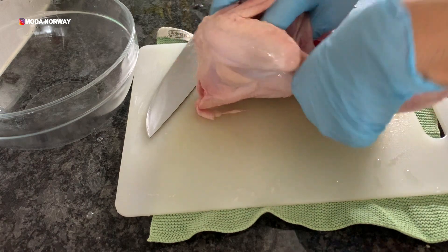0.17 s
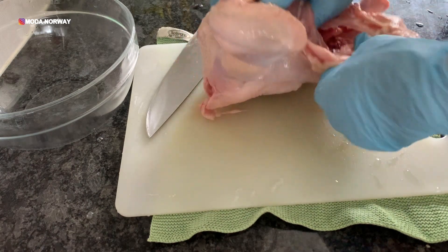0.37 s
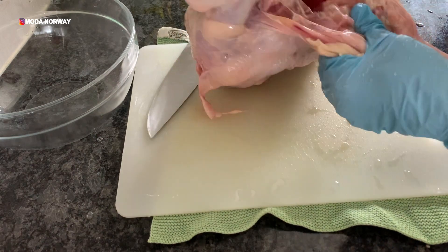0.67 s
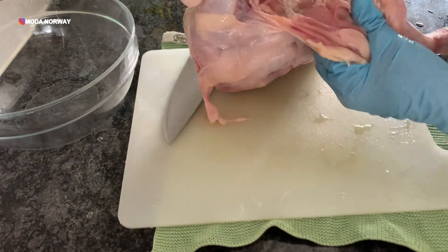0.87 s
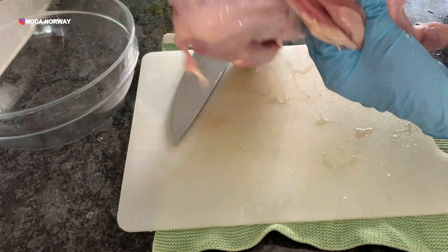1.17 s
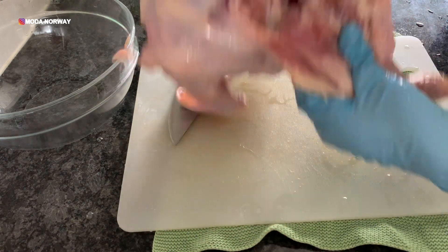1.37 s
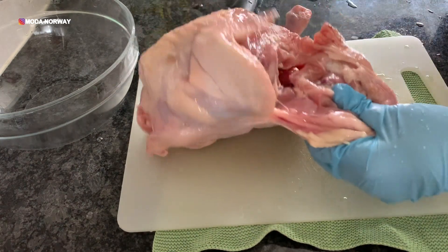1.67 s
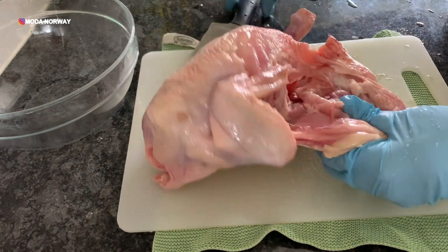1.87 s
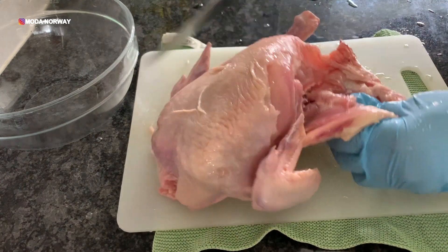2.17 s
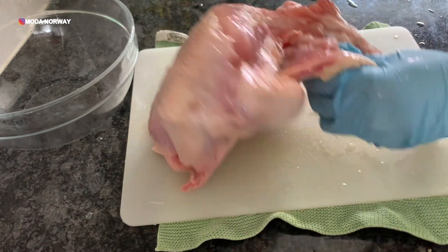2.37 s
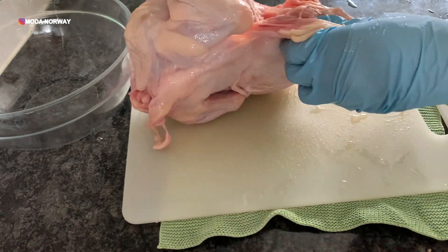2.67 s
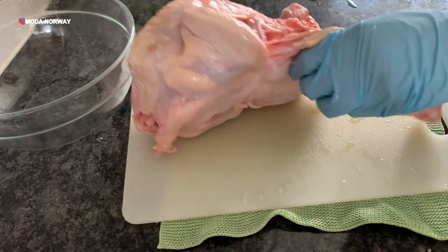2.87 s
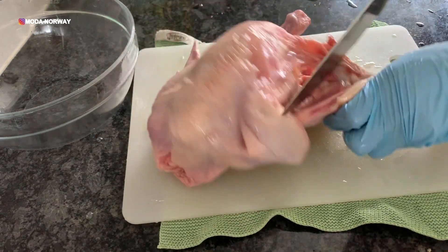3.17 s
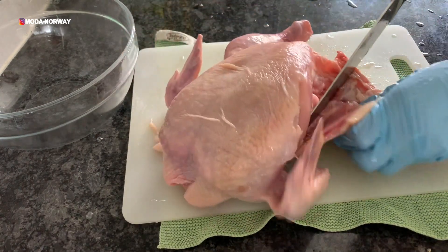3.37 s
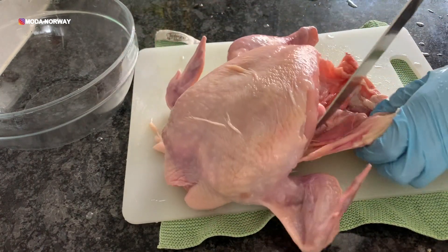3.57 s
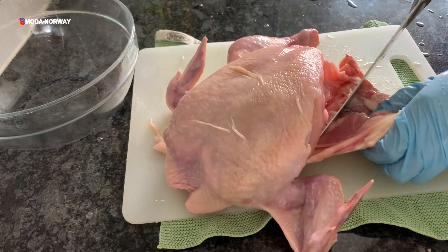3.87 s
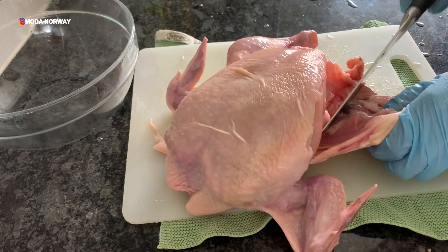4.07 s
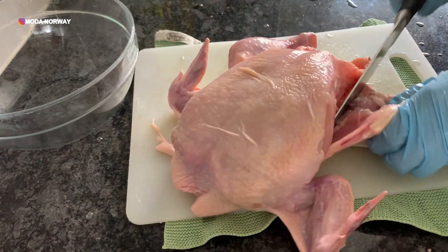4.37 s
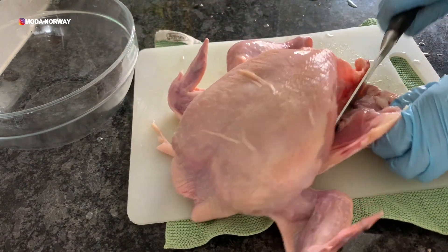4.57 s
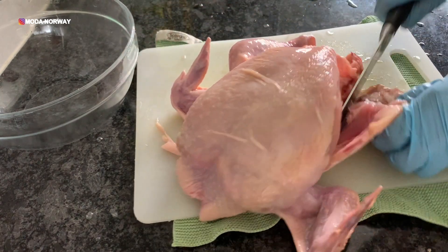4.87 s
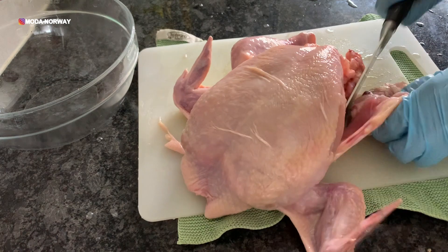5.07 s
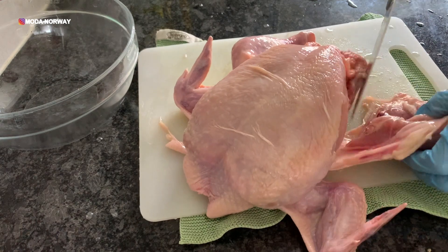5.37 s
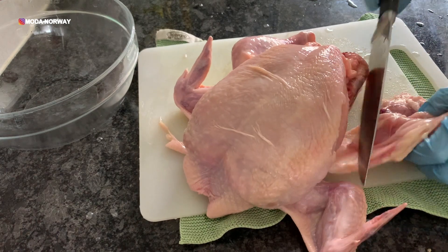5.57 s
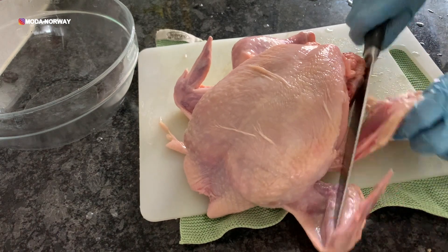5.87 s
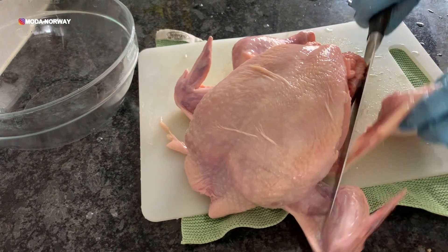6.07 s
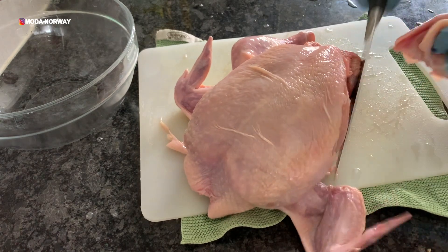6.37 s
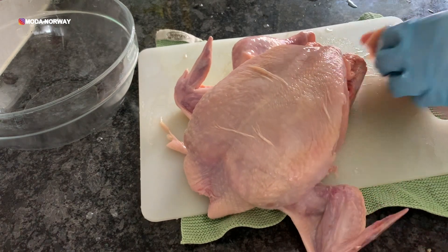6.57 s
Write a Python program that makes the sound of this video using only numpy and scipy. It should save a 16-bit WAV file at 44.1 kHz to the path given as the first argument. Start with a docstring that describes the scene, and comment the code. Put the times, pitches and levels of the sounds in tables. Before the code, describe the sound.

Close stereo microphones catch wet skin crackling and joints popping as a carcass is handled, with heavy fleshy thuds on plastic. Handling becomes lighter and sparser, then rhythmic knife strokes rasp and crunch through ribs, each making the board drone and sometimes knock. The loudest cut is followed by a short pause, three more strokes, a faint slip and a last soft thud. Short kitchen reflections and faint low rumble surround it.

```python
"""A small kitchen, with two microphone ports close to a plastic board where a raw chicken is handled and cut.
Gloved hands pull at the carcass: wet skin crackles and squelches (random grains, small damped rings),
joints snap (short noise bursts), and the meat flops onto the board (sinking tones and a resonant thud).
A knife then saws through the ribs in short strokes: slip grains hiss, crunch and make the board drone.
Behind it lie the room's reflections, quiet air and a low rumble of the worktop."""
import sys
import numpy as np
from scipy import signal
from scipy.fft import rfft, irfft, next_fast_len
from scipy.io import wavfile
from scipy.ndimage import uniform_filter1d, map_coordinates

SR = 44100
rng = np.random.default_rng(int(sys.argv[2]) if len(sys.argv) > 2 else 0)


def wrap_up_sound(samples):
    """Save the sound to the file named by the first command line argument, as 16-bit audio."""
    columns = np.atleast_2d(samples).T
    # keep every value between -1 and 1, then stretch to whole-number steps
    tamed = np.clip(columns, -1, 1)
    steps = np.round(tamed * 32767).astype(np.int16)
    wavfile.write(sys.argv[1], SR, steps)


N = 296793  # length in samples
TOP_HZ = 15850  # upper edge of the band

# All dB values in the tables are relative: the functions add their own trims.
# Low rumble of the worktop over time. Each row: time in seconds, level in dB.
RUMBLE_LEVELS = [(0.0, -45.5), (0.09, -49), (0.13, -45.5), (0.25, -42), (0.3, -49.5), (0.47, -52.5),
                 (0.63, -55), (0.69, -40), (0.85, -48.5), (1.37, -59.5), (1.42, -48.5), (1.74, -68.5),
                 (1.87, -54.5), (2.2, -66.5), (5.4, -68), (6.5, -53), (6.65, -56), (6.73, -54)]
# Colour of that rumble. Each row: frequency in Hz, level in dB.
RUMBLE_COLOUR = [(20, -12), (33, -37.5), (45, 4.5), (56, 1.5), (90, -7), (200, -29), (500, -62.5)]
# Colour of the quiet room air. Each row: frequency in Hz, level in dB.
AIR_COLOUR = [(20, -28), (35, -28.5), (55, -4), (85, 0), (125, 8.5), (170, 4), (260, -7), (500, -8.5),
              (1200, -18), (3000, -18), (10000, -20.5), (15500, -25)]
# Dying away of the kitchen. Each row: frequency in Hz, time to fall 60 dB in seconds.
KITCHEN_T60 = [(200, 0.51), (530, 0.33), (1400, 0.44), (3700, 0.38), (10000, 0.28), (16000, 0.25)]
# Left-right likeness of diffuse sound. Each row: frequency in Hz, correlation from -1 to 1.
LIKENESS = [(100, .93), (300, .65), (800, .25), (2500, -.1), (7000, .1), (10000, .65), (15000, .7)]
# Phase between the microphone ports. Each row: frequency in Hz, lead of the left in radians.
PORT_PHASE_LEAD = [(4000, 0), (6500, -.3), (8000, -1.6), (8900, -3.4), (9600, -5.3), (10800, -6.9),
                   (11700, -9.4), (12900, -12.1), (14100, -13), (15000, -16), (16000, -18)]
# Level between the microphone ports. Each row: frequency in Hz, left minus right in dB.
PORT_LEVEL_TILT = [(100, .6), (700, 1.8), (1300, -.3), (3000, 1.2), (5000, -2.2), (6700, -3.7), (9500, -.3),
                   (15000, 0)]

# Resonances of the bare board. Each row: frequency in Hz, width in Hz, level in dB.
BOARD_MODES = [(180, 100, -11), (290, 90, -16), (403, 50, -12), (615, 90, 1), (707, 66, 5), (845, 80, -2.5),
               (1082, 150, -13), (1325, 45, -9)]
# Resonances of the board under meat. Each row: frequency in Hz, width in Hz, level in dB.
LOADED_BOARD_MODES = [(70.4, 29, -2.5), (138, 37, 3.5), (184, 31, 1.5), (244, 110, -4), (394, 640, -16.5),
                      (620, 44, 3.5), (740, 46, -10), (1100, 260, -9)]

# Each grip, pull or push on the wet meat.
# Each row: start in seconds, hold in seconds, squelch in dB, rubbing on the board in dB.
HAND_MOVES = [(0, 0.01, -41, -51), (0.069, 0.1, -51, -48.5), (0.27, 0.33, -46.5, -58.5),
              (0.635, 0.27, -47, -48), (0.908, 0.074, -57, -55), (1.145, 0.25, -63, -72),
              (1.432, 0.014, -40.5, -41.5), (1.494, 0.018, -43.5, -50), (2.017, 0.05, -46.5, -44),
              (2.218, 0.057, -46, -51), (2.307, 0.14, -52, -56), (2.777, 0.031, -58.5, -80.5),
              (2.953, 0.039, -50.5, -67), (3.192, 0.0313, -61.5, -59), (3.213, 0.11, -79, -56.5),
              (3.4, 0.049, -53.5, -45.5), (3.48, 0.032, -57, -49.5), (3.667, 0.09, -70.5, -57),
              (3.932, 0.0044, -56.5, -51.5)]
# Time to gain 20 dB in a grip: squelch, then rubbing, in seconds.
GRIP_RISE_S = [0.12, 0.046]
# Time to lose 20 dB after a grip: squelch, then rubbing, in seconds.
GRIP_FALL_S = [0.13, 0.039]
# Colour of wet skin. Each row: frequency in Hz, level in dB.
WET_COLOUR = [(300, -24), (900, -22), (2000, -5.5), (4500, 2), (7000, 4.5), (10400, 6), (12000, -1),
              (14000, 6.5), (15700, -17.5)]
# Colour of meat dragged on plastic. Each row: frequency in Hz, level in dB.
RUB_COLOUR = [(100, 2), (250, -4.5), (450, -10), (700, 6.5), (1100, -11), (1600, -6), (3000, -3),
              (6000, -14)]
# Skin sliding and peeling. Each row: time of the height in seconds, width in seconds, level in dB.
SLIDES = [(2.058, 0.019, -45.5), (2.955, 0.012, -35.5), (3.433, 0.018, -49.5), (6.581, 0.0085, -62.5),
          (6.65, 0.12, -65.5)]
# Pockets of wet air squeezed out of skin and meat.
# Each row: time of the height in seconds, width in seconds, level in dB, middle pitch in Hz.
SQUISHES = [(.08, .05, -59, 1170), (.35, .08, -61.5, 1930), (.74, .06, -52, 2020),
            (2.036, .02, -55.5, 3020), (2.073, .01, -46, 1310), (3.26, .045, -60.5, 1370),
            (3.435, .025, -54.5, 1510), (3.5, .015, -59, 1100), (3.72, .012, -61.5, 1900),
            (6.583, .005, -52, 2200), (6.642, .008, -61.5, 2000)]
# The carcass sagging onto the board. Each row: time of the height in seconds, width in seconds, level in dB.
SAGS = [(1.46, 0.057, -48.5), (1.86, 0.025, -63), (1.97, 0.036, -46.5), (3.33, 0.037, -51.5),
        (3.47, 0.018, -56), (6.63, 0.076, -56)]
# Meat and bone landing on the board. Each row: start in seconds, slap in dB, starting pitch of the slap in Hz,
# time for the slap to fall 60 dB in seconds, thud of the weight in dB.
FLOPS = [(0.667, -24, 893, 0.032, -35), (0.672, -32.5, 340, 0.042, -39), (0.786, -39, 717, 0.047, -39),
         (1.398, -25.5, 992, 0.03, -52), (1.422, -36, 3276, 0.067, -33.5), (1.424, -26.5, 2085, 0.05, -44),
         (1.43, -15.5, 1104, 0.032, -57), (1.437, -22.5, 747, 0.034, -28), (1.44, -26, 237, 0.058, -46),
         (1.473, -41, 903, 0.05, -39), (1.832, -53, 383, 0.12, -37), (1.872, -46, 221, 0.09, -35),
         (1.936, -26, 786, 0.046, -33.5), (1.955, -58, 435, 0.075, -44), (1.984, -42, 1000, 0.035, -50),
         (1.997, -34, 1104, 0.03, -45), (2.001, -29.5, 320, 0.045, -43), (2.074, -44.5, 944, 0.058, -44),
         (3.255, -42.5, 705, 0.04, -65), (3.416, -51, 1120, 0.072, -62), (3.423, -37, 577, 0.045, -48),
         (3.436, -37, 329, 0.051, -58), (3.492, -42, 679, 0.049, -64), (3.5, -43, 342, 0.069, -49),
         (3.522, -67, 298, .08, -41), (3.676, -51, 677, 0.074, -52), (6.584, -29, 682, 0.049, -31),
         (6.586, -30.5, 380, 0.058, -20), (6.612, -69, 617, 0.17, -29)]
# Joints, gristle and wet skin snapping. Each row: start in seconds, high crack in dB, lower pop in dB.
SNAPS = [(0.051, -52, -44), (0.2702, -38, -54), (0.285, -42, -44), (0.301, -47, -43), (0.3363, -41, -41),
         (0.3582, -38.5, -47), (0.4434, -28, -43), (0.4603, -36.5, -43), (0.479, -50, -44),
         (0.5257, -20.5, -26), (0.6329, -29, -32), (0.6689, -35, -30), (0.703, -26, -35),
         (0.7313, -40, -43), (0.7843, -12, -21.5), (0.8745, -42, -44), (0.957, -50, -46),
         (1.0599, -43, -66), (1.0707, -42, -70), (1.399, -28.5, -46), (1.419, -23, -37), (1.4315, -44, -30),
         (1.4425, -46, -35), (1.741, -52, -68), (1.9152, -49, -62), (1.9995, -48, -41), (2.2842, -38, -62),
         (2.4733, -37.5, -80), (2.853, -46, -76), (3.222, -50, -53), (3.4483, -43.5, -51),
         (3.926, -39, -39), (3.994, -52, -57), (4.1, -50, -36), (4.1473, -29.5, -41), (4.2012, -41, -68),
         (4.2784, -35, -48), (4.473, -32, -33), (4.5353, -35, -42), (4.5608, -26, -33), (4.717, -31, -44),
         (4.7872, -23, -31), (5.2055, -24, -23), (5.326, -45, -66), (5.372, -66, -52), (6.259, -52, -41)]
# Colour of the top of a snap. Each row: frequency in Hz, level in dB.
CRACK_COLOUR = [(1500, -29.5), (4500, -5.5), (6800, 4), (10400, 5.5), (13000, 1.5), (15500, 3)]
# Colour of the body of a snap. Each row: frequency in Hz, level in dB.
POP_COLOUR = [(200, -23), (500, 3.5), (900, 7.5), (1500, 9.5), (3200, 13.5), (4800, 8.5), (12000, -20.5)]

# Thin wet scrapes. Each row: time of the height in seconds, width in seconds, level in dB, pitch in Hz.
SCRAPES = [(3.682, 0.0044, -56.5, 6300), (3.735, 0.012, -59, 5700), (3.882, 0.0087, -57.5, 5460),
           (4.022, 0.017, -52.5, 4000), (4.095, 0.033, -46.5, 2070), (6.249, 0.01, -51, 2480)]
# The blade breaks through a rib and knocks the board. Each row: start in seconds, ring in dB, low thump in dB.
KNOCKS = [(4.472, -34, -33), (4.563, -34.5, -25.5), (4.727, -21, -30), (4.844, -20.5, -32),
          (4.856, -27.5, -50.5), (5.029, -24.5, -53), (5.072, -30, -61), (5.191, -18, -37),
          (5.206, -12.5, -15), (5.93, -19, -38), (6.064, -25, -29.5), (6.311, -26, -42)]
# Knife strokes. Each row: start in seconds, hold in seconds, hiss of the edge in dB, crunch of bone in dB,
# drone of the board in dB.
STROKES = [(4.075, 0.035, -37, -64, -52.5), (4.243, 0.089, -45.5, -52, -55.5),
           (4.396, 0.087, -33, -39.5, -38.5), (4.558, 0.082, -34.5, -38, -35.5),
           (4.725, 0.04, -33.5, -33, -31), (4.855, 0.045, -34, -30, -30.5),
           (4.912, 0.015, -29.5, -35.5, -34), (5.031, 0.032, -39, -33.5, -30.5),
           (5.196, 0.021, -28, -25.5, -23.5), (5.751, 0.045, -38.5, -47.5, -63),
           (5.906, 0.034, -28.5, -29.5, -22), (6.058, 0.064, -34.5, -36.5, -39),
           (6.302, 0.018, -40, -40.5, -35), (6.417, 0.043, -55.5, -82, -70)]
# Faint hiss and board ring lingering under and after the strokes.
# Each row: start in seconds, hold in seconds, hiss in dB, crunch in dB, board in dB.
LINGERING = [(4.362, 0.99, -58.5, -69, -57), (5.687, 0.1, -50.5, -58.5, -65),
             (5.991, 0.06, -60.5, -63, -45.5)]
# Time to gain 20 dB into a stroke: hiss and crunch swell together, the board faster.
# The values: hiss, crunch, board, in seconds.
STROKE_RISE_S = [0.046, 0.047, 0.031]
# Time to lose 20 dB as the blade stops: hiss, crunch, board, in seconds.
STROKE_FALL_S = [0.041, 0.026, 0.017]
# Colour of the edge in flesh. Each row: frequency in Hz, level in dB.
FLESH_COLOUR = [(600, -35.5), (2500, 1), (4500, 10.5), (5800, 3.5), (8300, 9.5), (9500, 9), (10600, 5),
                (13500, 6.5), (15700, -2)]
# Colour of the edge in bone. Each row: frequency in Hz, level in dB.
BONE_COLOUR = [(250, -19), (800, -28.5), (1350, -9), (1900, -1), (3000, 2), (3700, -5), (5000, -11.5),
               (9000, -24)]


def amp(db):
    """Decibels to gain."""
    return 10 ** (np.asarray(db) / 20)


def unit(x):
    """Scale to rms 1."""
    return x / np.sqrt(np.mean(x ** 2) + 1e-20)


def along(points, hz):
    """(Hz, value) points read on a log axis."""
    f, v = np.transpose(points)
    return np.interp(np.log(hz + 1), np.log(f), v)


def wobble(rate):
    """A smooth random curve, rate knots a second."""
    knots = rng.standard_normal(int(N * rate / SR) + 4)
    return map_coordinates(knots, [np.arange(N) * rate / SR])


def filtered(x, response):
    """x times a complex response of frequency."""
    n = x.shape[-1]
    m = next_fast_len(n + SR // 4)
    return irfft(rfft(x, m) * response(np.fft.rfftfreq(m, 1 / SR)), m)[..., :n]


def coloured(x, points, size=8192):
    """x through a causal filter with the given (Hz, dB) shape."""
    # Folding the cepstrum forward in time gives the minimum-phase filter
    cepstrum = irfft(np.log(amp(along(points, np.fft.rfftfreq(size, 1 / SR)))))
    cepstrum[1:size // 2] *= 2
    cepstrum[size // 2 + 1:] = 0
    return signal.fftconvolve(x, irfft(np.exp(rfft(cepstrum))))[:len(x)]


def resonate(x, modes):
    """x through a body's resonances, band-passes added with alternating sign."""
    def response(f):
        total = 0
        for k, (centre, width, db) in enumerate(modes):
            damping = 1j * f * width
            total = total + (-1) ** k * amp(db) * damping / (centre * centre - f * f + damping)
        return total
    return filtered(x, response)


def add(track, s, sound):
    """Mix a sound in at time s."""
    part = track[max(round(s * SR), 0):][:len(sound)]
    part += sound[:len(part)]


def grains(rate, spread_db, smooth):
    """Random tiny slips, nearly equal in size when spread_db is near 0, rate a second, over smooth friction."""
    sizes = amp(spread_db * np.minimum(rng.exponential(size=N), 4)) * rng.choice([-1, 1], N)
    slips = unit(sizes * (rng.random(N) < rate / SR))
    return unit(slips + smooth * rng.standard_normal(N))


def drifting(x, depth_db, size):
    """The colour drifts over patches of size bands as the contact point moves."""
    z = signal.stft(x, nperseg=512)[2]
    field = uniform_filter1d(rng.standard_normal(z.shape), size=size, axis=0)
    field = uniform_filter1d(field, size=10, axis=1)
    return unit(signal.istft(z * amp(depth_db * unit(field)), nperseg=512)[1][:N])


def bending(x, depth, rate):
    """The pitch of a ring wanders as the load on the board shifts."""
    return map_coordinates(x, [np.cumsum(1 + depth * wobble(rate))], order=1, mode="mirror")


def swells(rows, rise_s, fall_s):
    """Rise, hold and release for each (start, hold, dB, ..) row; one gain curve for each dB column."""
    t = np.arange(N) / SR
    power = 0
    for start, hold, *levels in rows:
        before, after = np.maximum(start - t, 0), np.maximum(t - start - hold, 0)
        fade = before / np.vstack(rise_s) + after / np.vstack(fall_s)  # in steps of 20 dB
        power = power + amp(np.vstack(levels) - 20 * np.minimum(fade, 10)) ** 2
    return np.sqrt(power)


def humps(rows):
    """A bell-shaped gain for each (time of the height, width, dB) row."""
    t = np.arange(N) / SR
    return sum(amp(db) * np.exp(-.5 * ((t - s) / width) ** 2) for s, width, db in rows)


def pips(start, hz, strength, cycles):
    """Tiny rings, one for each row of start (samples), pitch and strength; they fall 60 dB in some cycles."""
    t = np.arange(SR // 60) / SR
    hz = np.minimum(hz, TOP_HZ)
    rings = strength * np.sin(2 * np.pi * hz * t) * amp(-60 * t * hz / cycles)
    return np.bincount((start + np.arange(len(t))).ravel(), rings.ravel(), N)[:N]


def diffuse(pair):
    """Two unrelated signals become a left and right that are partly alike."""
    def mid_and_side(hz):
        turn = np.arccos(np.clip(along(LIKENESS, hz), -1, 1)) / 2
        return np.array([np.cos(turn), np.sin(turn)])
    mid, side = filtered(pair, mid_and_side)
    return np.array([mid + side, mid - side])


def background(air_db=-61, rumble_db=0):
    """Quiet room air spread across both ports, and a low worktop rumble whose level rises and falls."""
    air = diffuse(np.array([coloured(noise, AIR_COLOUR) for noise in rng.standard_normal((2, N))]))
    sway_db = np.interp(np.arange(N) / SR, *np.transpose(RUMBLE_LEVELS))
    rumble = unit(coloured(rng.standard_normal(N), RUMBLE_COLOUR))
    return amp(air_db) * unit(air) + amp(rumble_db + sway_db) * rumble


def kitchen(x, tail_db=-8, near_db=-4, near_t60=0.035, near_hz=550, count=24):
    """Nearby things throw back the treble at once, then the room dies away; count equal spans answer anew."""
    out = np.zeros((2, N))
    small_things = signal.butter(2, near_hz, "high", fs=SR, output="sos")
    for piece in np.array_split(np.arange(N), count):
        hz, t, z = signal.stft(rng.standard_normal((2, SR // 2)), SR, nperseg=256)
        decay = amp(-60 * t / along(KITCHEN_T60, hz)[:, None])
        tail = signal.istft(z * decay, SR, nperseg=256)[1]
        t = np.arange(tail.shape[1]) / SR
        near = signal.sosfilt(small_things, rng.standard_normal(tail.shape))
        near = near * amp(-60 * t / near_t60) * (t > .001)
        answer = amp(tail_db) * tail / np.linalg.norm(tail[0])
        answer = answer + amp(near_db) * near / np.linalg.norm(near[0])
        for channel, echo in zip(out, signal.fftconvolve(x[None, piece], answer, axes=1)):
            add(channel, piece[0] / SR, echo)
    return diffuse(out)


def sagging(soft_hz=480):
    """The carcass settles in many small soft contacts that rumble in the board."""
    soft = signal.butter(2, soft_hz, fs=SR, output="sos")
    contacts = signal.sosfilt(soft, grains(rate=210, spread_db=2.5, smooth=0.16))
    return humps(SAGS) * unit(resonate(contacts, LOADED_BOARD_MODES))


def squishes(spread_octaves=0.43, count=40):
    """Each squeeze lets out a cluster of small bubbles around one pitch."""
    out = np.zeros(N)
    for s, width, db, hz in SQUISHES:
        when, octaves, size = np.clip(rng.standard_normal((3, count, 1)), -2, 2)
        start = np.round(np.abs(s + width * when) * SR).astype(int)
        cluster = pips(start, hz * 2 ** (spread_octaves * octaves), amp(3 * size), cycles=8)
        # Weigh by duration, so that the level holds over the squeeze and not over the whole track
        out += amp(db) * unit(cluster) * np.sqrt(2 * abs(width) * SR / N)
    return out


def sticky(wet, tick_db, centre_hz, spread_octaves, count):
    """Tiny films of moisture burst as glove and skin part, each at its own pitch."""
    start = rng.integers(0, round(HAND_MOVES[-1][0] * SR), (count, 1))
    octaves, size = rng.standard_normal((2, count, 1))
    hz = centre_hz * 2 ** (spread_octaves * np.clip(octaves, -2, 2))
    strength = amp(tick_db + 4 * np.minimum(size, 1.5)) * wet[start]
    return pips(start, hz, strength, cycles=8)


def squelching(wet, rub, wet_db=-4, rub_db=-5, clump_db=2):
    """Wet skin crackles under the gloves, rubs the board and now and then slides."""
    clumps = amp(clump_db * wobble(72))
    crackle = coloured(grains(rate=920, spread_db=0.5, smooth=0.69) * clumps, WET_COLOUR)
    rubbing = coloured(grains(rate=490, spread_db=-0.5, smooth=0.21), RUB_COLOUR)
    peel = unit(coloured(grains(rate=5000, spread_db=1, smooth=1.0), WET_COLOUR))
    squelch = amp(wet_db) * wet * drifting(crackle, depth_db=1, size=16)
    drag = amp(rub_db) * rub * drifting(rubbing, depth_db=3.5, size=5)
    return squelch + drag + humps(SLIDES) * peel


def flops(rough=0.93, width=0.32, push_s=0.0041, lag_s=0.00095, attack_s=0.0068, sink_s=0.01506, sink_octaves=.5):
    """Meat lands with a slap whose pitch sinks as the contact spreads; then its weight pushes the board."""
    out, t = np.zeros(N), np.arange(SR // 3) / SR
    thud = resonate(np.sin(np.pi * np.minimum(t / push_s, 1)) ** 2, LOADED_BOARD_MODES)
    for s, slap_db, hz, t60, thud_db in FLOPS:
        pitch = hz * 2 ** (sink_octaves * (np.exp(-t / sink_s) - 1))
        phase = 2 * np.pi * np.cumsum(pitch) / SR
        # Slow noise on both quadratures widens the tone into a rough band
        slow = signal.butter(2, width * hz, fs=SR, output="sos")
        a, b = unit(signal.sosfilt(slow, rng.standard_normal((2, len(t)))))
        contact = amp(slap_db - 60 * t / t60) * (1 - np.exp(-t / attack_s))
        slap = contact * ((1 + rough * a) * np.sin(phase) + rough * b * np.cos(phase))
        add(out, s, 2 * unit(slap) * np.sqrt(np.mean(contact ** 2)))
        add(out, s + lag_s, amp(thud_db) * thud / np.abs(thud).max())
    return out


def small_snaps(count=18, crack_db=-47.5, spread_db=1.5, pop_db=-18.5):
    """Faint snaps at random moments while the hands work, as rows like SNAPS; pop_db is against the crack."""
    when, size = rng.random((count, 2)).T
    start, hold = np.transpose(HAND_MOVES)[:2]
    move = rng.choice(len(HAND_MOVES), count, p=np.abs(hold) / np.abs(hold).sum())  # long moves hold more
    high_db = crack_db + spread_db * (2 * size - 1)
    return list(zip(start[move] + when * hold[move], high_db, high_db + pop_db))


def snaps(crack_t60=0.00094, tear_t60=0.035, tear_db=-13, crack_db=1, pop_db=0, length_s=.004):
    """A sharp break, then some milliseconds of tearing; a lower pop, strongest in thick gristle, goes with it."""
    out, t = np.zeros(N), np.arange(SR // 8) / SR
    shape = amp(-60 * t / crack_t60) + amp(tear_db - 60 * t / tear_t60)
    for s, high_db, low_db in SNAPS + small_snaps():
        burst = shape * rng.standard_normal(len(t))
        crack = amp(crack_db + high_db) * unit(coloured(burst, CRACK_COLOUR))
        pop = amp(pop_db + low_db) * unit(coloured(burst, POP_COLOUR))
        # The energy equals that of length_s seconds at the snap's level
        add(out, s, (crack + pop) * np.sqrt(length_s / t[-1]))
    return out


def scrapes(width_hz=480):
    """The blade skids briefly on wet bone with a narrow, half-pitched rasp."""
    out, t = np.zeros(N), np.arange(-SR // 8, SR // 8) / SR
    for s, width, db, hz in SCRAPES:
        slips = grains(rate=1200, spread_db=2, smooth=.3)[:len(t)]
        rasp = unit(resonate(slips, [(hz, width_hz, 0)]))
        add(out, s + t[0], amp(db) * np.exp(-.5 * (t / width) ** 2) * rasp)
    return out


def knocks(t60=0.0035, push_hz=190, push_t60=0.034, push_rise_s=0.0031):
    """Each broken rib lets the blade strike the board, which rings and gives way with a short low thump."""
    out, t = np.zeros(N), np.arange(SR // 4) / SR
    push = amp(-60 * t / push_t60) * np.sin(2 * np.pi * push_hz * t) * (1 - np.exp(-t / push_rise_s))
    for s, ring_db, thump_db in KNOCKS:
        blow = resonate(amp(-60 * t / t60) * rng.standard_normal(len(t)), BOARD_MODES)
        add(out, s, amp(ring_db) * blow / np.abs(blow).max() + amp(thump_db) * push)
    return out


def splinters(crunch, middle_hz=1700, rise_octaves=0.61, margin_s=.02, count=45):
    """Chips of bone break off under the edge, tending higher in pitch as each stroke runs on."""
    begin, hold = np.repeat(np.array(STROKES)[:, :2], count, axis=0).T[..., None]
    progress = rng.random(begin.shape)
    octaves, size = rng.standard_normal((2, *begin.shape))
    when = begin - margin_s + progress * (hold + 2 * margin_s)
    start = np.round(when * SR).astype(int)
    hz = middle_hz * 2 ** (rise_octaves * (progress - .5) + .5 * octaves)  # around the middle pitch of the chips
    return pips(start, hz, amp(1 + 5 * np.minimum(size, 1.7)) * crunch[start], cycles=7)


def sawing(hiss_db=-4.5, crunch_db=-6.0, board_db=-6, catch_db=1.0):
    """The edge catches and tears fibres and bone; the slips in the bone also shake the board."""
    hiss, crunch, board = swells(STROKES + LINGERING, STROKE_RISE_S, STROKE_FALL_S)
    catch = amp(catch_db * wobble(170))
    tears = catch * grains(rate=3500, spread_db=2, smooth=.5)
    fibres = drifting(coloured(tears, FLESH_COLOUR), depth_db=3, size=14)
    slips = catch * grains(rate=1100, spread_db=2.3, smooth=.25)
    grind = drifting(coloured(slips, BONE_COLOUR), depth_db=4.5, size=7)
    shaken = resonate(slips * amp(3 * wobble(60)), BOARD_MODES)
    drone = bending(drifting(shaken, depth_db=2, size=3), depth=.025, rate=7)
    edge = amp(hiss_db) * hiss * fibres
    bone = amp(crunch_db) * crunch * grind + splinters(crunch)
    return edge + bone + amp(board_db) * board * drone


def scene(knife_wet_db=2, hands_wet_db=0, snaps_wet_db=-2):
    """Hands and knife at the board, in the room; the wet settings are their sends to the kitchen."""
    wet, rub = swells(HAND_MOVES, GRIP_RISE_S, GRIP_FALL_S)
    hands = squelching(wet, rub) + flops() + sagging() + squishes()
    hands = hands + sticky(wet, tick_db=6, centre_hz=3800, spread_octaves=.7, count=1100)
    joints = snaps()
    knife = sawing() + knocks() + scrapes()
    send = amp(knife_wet_db) * knife + amp(hands_wet_db) * hands + amp(snaps_wet_db) * joints
    return knife + hands + joints + kitchen(send) + background()


def record(dry):
    """The two microphone ports differ in level and phase; the highest peaks are rounded, the band limited."""
    half = np.array([[.5], [-.5]])  # each port takes half of the difference

    def ports(hz):
        return amp(along(PORT_LEVEL_TILT, hz) * half) * np.exp(1j * along(PORT_PHASE_LEAD, hz) * half)
    x = filtered(dry, ports)
    x = x / (1 + (x / .8) ** 4) ** .25
    return filtered(x, lambda hz: hz < TOP_HZ)


dry = scene()
out = record(dry)
wrap_up_sound(out)
```